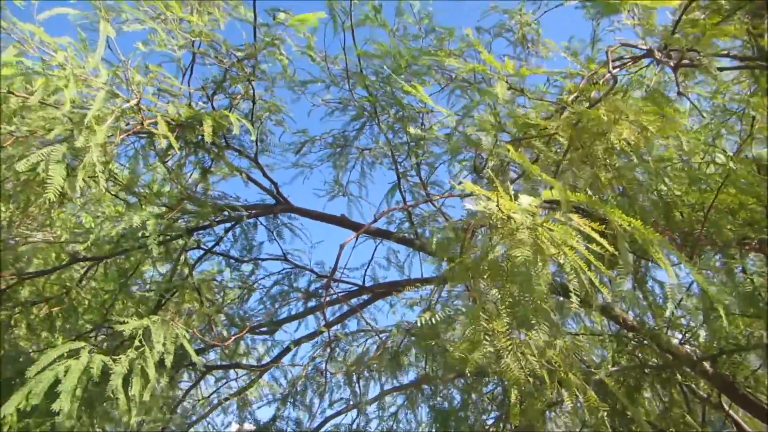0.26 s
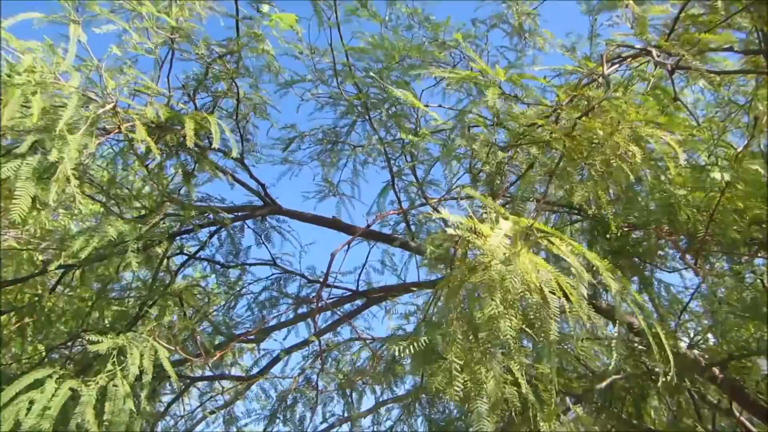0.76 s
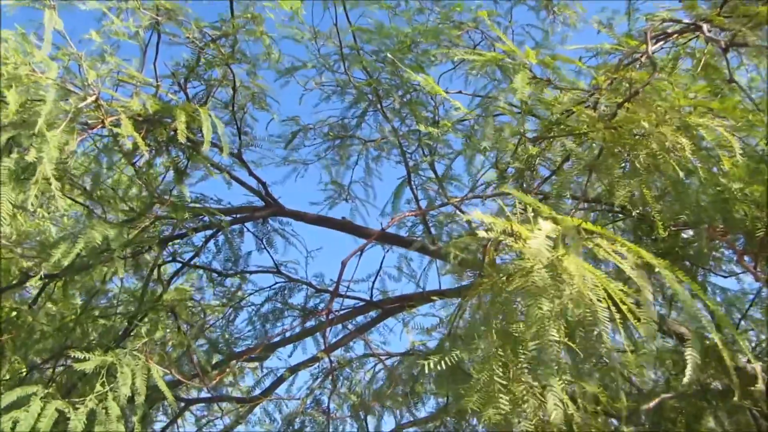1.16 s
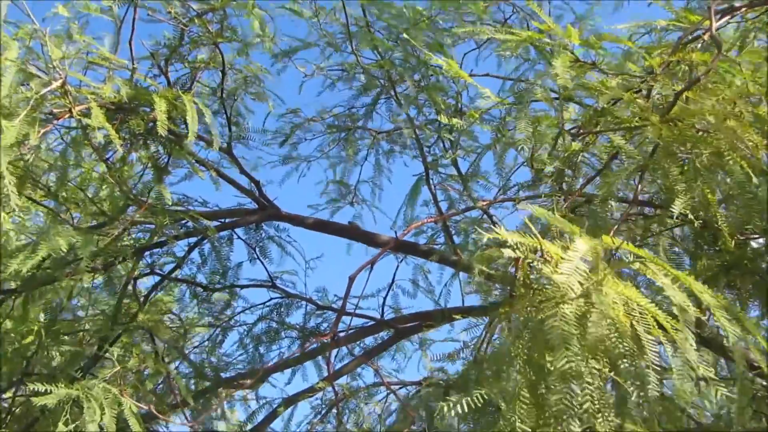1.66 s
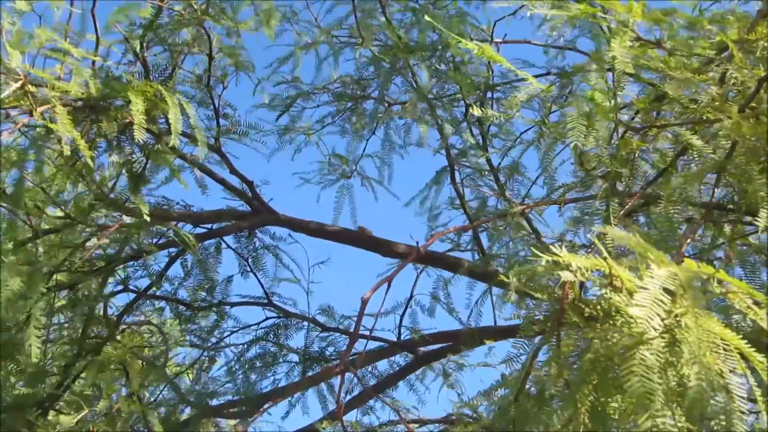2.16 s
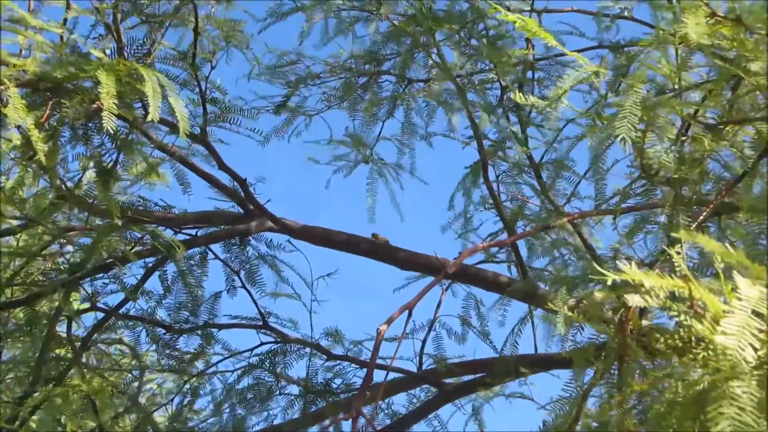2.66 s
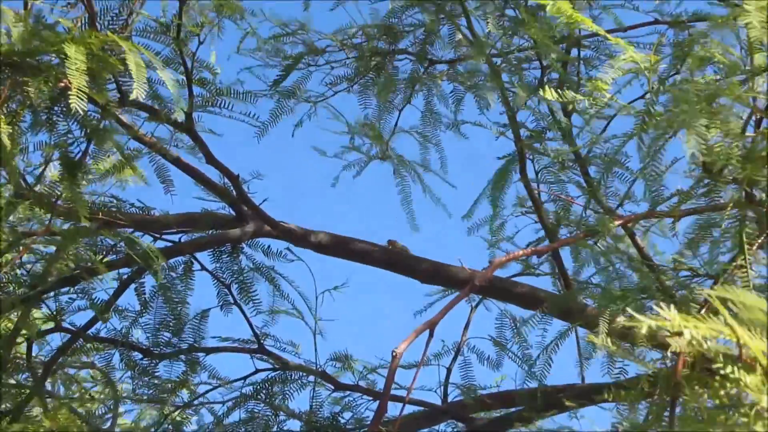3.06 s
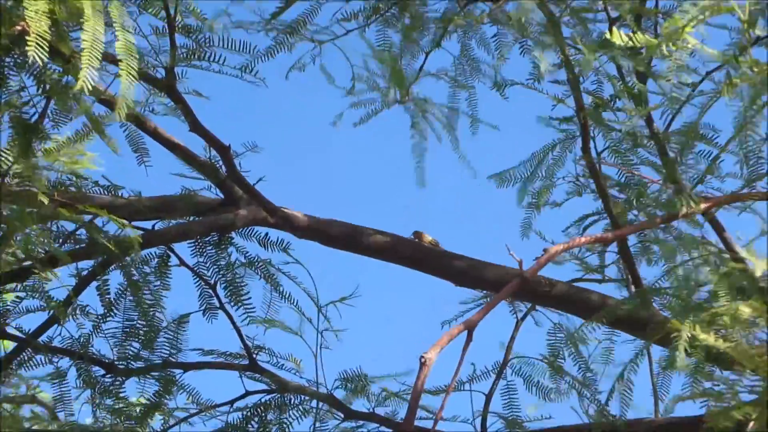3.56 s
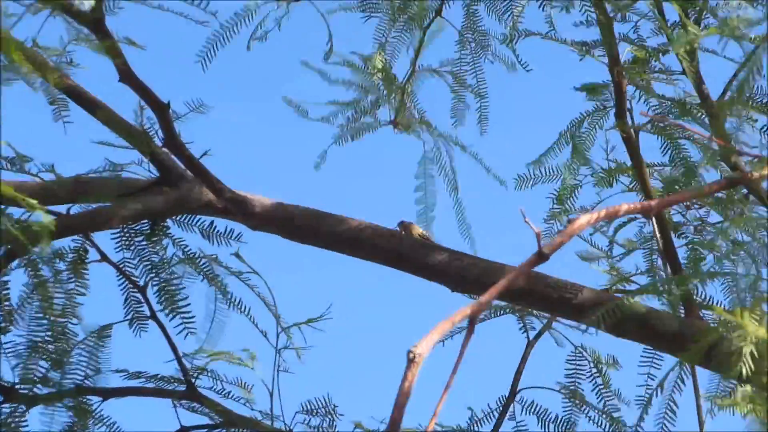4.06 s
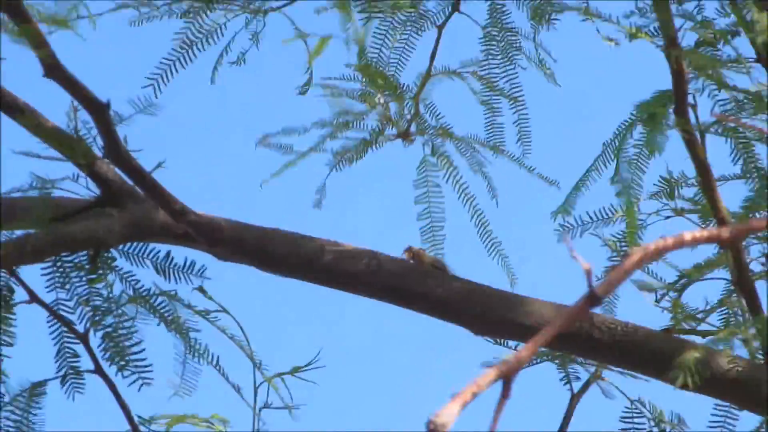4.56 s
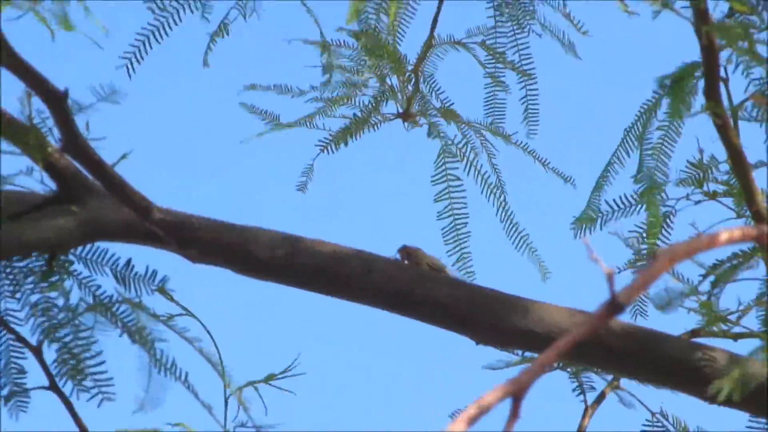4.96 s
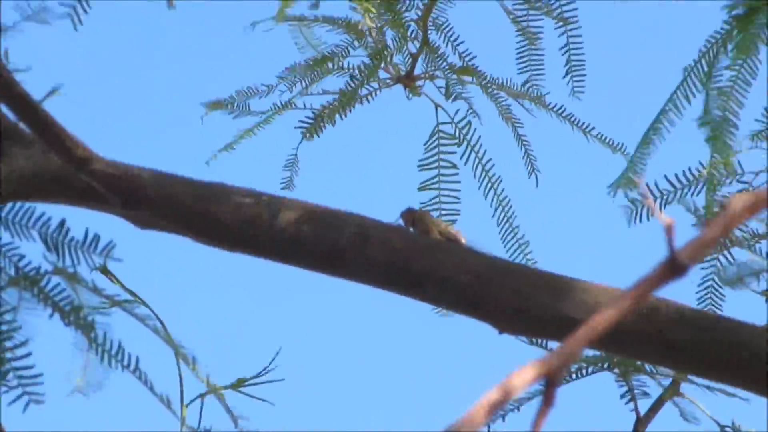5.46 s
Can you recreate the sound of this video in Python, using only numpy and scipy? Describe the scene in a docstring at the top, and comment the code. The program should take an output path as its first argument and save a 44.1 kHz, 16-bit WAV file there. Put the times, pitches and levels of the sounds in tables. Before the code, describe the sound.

A cicada sings a steady, high-pitched buzz in a tree overhead, with a fainter one farther off and a low outdoor rumble. Early on, a click starts a faint camera zoom whirr and the buzz turns thinner. The song swells, then slowly weakens. Soft wind puffs and low bumps touch the microphone. Near the end the lens ticks to a stop, and the buzz carries on, fuller in tone but more relaxed.

```python
"""A cicada sings overhead, its tymbals buckling about 160 times a second in quick runs of rib clicks.
A distant one buzzes a little slower, over a faint outdoor rumble. At 0.6 s a camera lens starts to zoom:
its drive ticks, its motor whirrs, and a fixed filter against the whine clicks in and thins the song.
The near song swells until 2.4 s, then slowly tires. From 3.7 s come puffs of wind and bumps on the camera.
Around 4.6 s the near cicada eases off, the motor stops, the filter drops out and the drive ticks to rest."""
import sys
import numpy as np
from scipy import signal
from scipy.fft import rfft, irfft, next_fast_len
from scipy.io import wavfile
from scipy.ndimage import uniform_filter1d, map_coordinates

SR = 44100
rng = np.random.default_rng(int(sys.argv[2]) if len(sys.argv) > 2 else 0)


def persist_wave(psi):
    """Save psi, clipped to +-1, as 16-bit WAV."""
    counts = np.round(np.clip(psi, -1, 1) * 32767).astype(np.int16)
    wavfile.write(sys.argv[1], SR, np.atleast_2d(counts).T)


N = 251370
T = np.arange(N) / SR


def amp(db):
    """Decibels to gain."""
    return 10 ** (np.asarray(db) / 20)

def rms(x):
    """Root mean square."""
    return np.sqrt(np.mean(x ** 2) + 1e-20)

def gain_at(spectrum, hz):
    """Gain between (freq_hz, gain_db) points, log frequency axis."""
    freq_hz, gain_db = np.transpose(spectrum)
    return amp(np.interp(np.log(hz + 1), np.log(freq_hz + 1), gain_db))

def wobble(knots_per_s):
    """Smooth random curve."""
    return map_coordinates(rng.standard_normal(int(T[-1] * knots_per_s) + 4), [T * knots_per_s])

def swell(crest_s, crest_db, drop_db_per_s2):
    """Gain with one broad crest."""
    return amp(crest_db - drop_db_per_s2 * (T - crest_s) ** 2)

def bell(centre_s, sigma_s):
    """Gaussian envelope."""
    return np.exp(-.5 * ((T - centre_s) / sigma_s) ** 2)

def filtered(x, response):
    """x through a frequency response."""
    size = next_fast_len(N + SR // 2)
    return irfft(rfft(x, size) * response(np.fft.rfftfreq(size, 1 / SR)), size)[:N]

def noise(spectrum):
    """Coloured noise, rms 1."""
    x = filtered(rng.standard_normal(N), lambda hz: gain_at(spectrum, hz))
    return x / rms(x)

def causal_filter(x, spectrum, size=2048):
    """x through a minimum-phase filter."""
    cepstrum = irfft(np.log(gain_at(spectrum, np.fft.rfftfreq(size, 1 / SR))))
    cepstrum[1:size // 2] *= 2
    cepstrum[size // 2 + 1:] = 0
    return signal.fftconvolve(x, irfft(np.exp(rfft(cepstrum))))[:N]

def impulses(times_s, gains, order=16):
    """Windowed-sinc impulses, placed between samples."""
    position = np.ravel(times_s)[:, None] * SR
    index = np.floor(position).astype(int) + np.arange(1 - order, order + 1)
    kernel = np.sinc(index - position) * np.cos(np.pi * (index - position) / (2 * order)) ** 2
    inside = (index >= 0) & (index < N)
    return np.bincount(index[inside], (np.ravel(gains)[:, None] * kernel)[inside], N)


# ribs of one stroke: delay_s, level_db
TYMBAL_RIBS = [(0, -2.4), (.000201, 0), (.0006, -6), (.00099, -5), (.001089, -13), (.001388, -10),
               (.001669, -12.4), (.00193, -12.3)]
# body resonance under one rib click: freq_hz, gain_db
BODY_RESONANCE = [(1500, -58), (2500, -46), (3850, -43), (4600, -49), (5800, -28.7), (6500, -13),
                  (7500, -14.5), (8800, .3), (10000, -7.6), (11200, .4), (12300, -13), (13700, -4.8),
                  (14700, -18), (15800, -25)]

def tymbal(stroke_hz):
    """Each stroke buckles the ribs in turn and rings the body; later ribs are less punctual."""
    count = int(T[-1] * stroke_hz) + 1
    strokes_s = (np.arange(count) + rng.random()) / stroke_hz
    jitter_s = 5e-5 * rng.standard_normal(count)
    drift_s = 1.6e-5 * np.cumsum(rng.standard_normal(count))
    strokes_s += jitter_s + drift_s
    delay_s, rib_db = np.transpose(TYMBAL_RIBS)
    stretch = 1 + .007 * rng.standard_normal((count, len(delay_s)))
    stroke_db = .15 * rng.standard_normal((count, 1))
    scatter_db = (.15 + delay_s / .0025) * rng.standard_normal(stretch.shape)
    clicks = impulses(strokes_s[:, None] + delay_s * stretch, amp(rib_db + stroke_db + scatter_db))
    return causal_filter(clicks, BODY_RESONANCE)

def branch_echoes(song, t60_s, tails=8):
    """Branches scatter the song; the echoes change slowly as the leaves sway."""
    t = T[:SR // 4]
    sway = np.linspace(0, tails - 1, N)
    echoes = np.zeros(N)
    for k in range(tails):
        tail = rng.standard_normal(len(t)) * amp(-60 * t / t60_s) * (t > .002)
        crossfade = np.cos(np.pi / 2 * np.clip(sway - k, -1, 1))
        echoes += crossfade * signal.fftconvolve(song, tail / np.linalg.norm(tail))[:N]
    return echoes

def effort(tire_per_s, start_s=.76, rise_s=1.63, relax_at_s=4.56, relax_s=.36, relax_share=.65):
    """The cicada pushes once, tires, then relaxes: 0 easy, 1 full effort."""
    rise = np.clip((T - start_s) / rise_s, 0, 1)
    tired = tire_per_s * np.maximum(T - start_s - rise_s, 0)
    relaxed = np.clip((T - relax_at_s) / relax_s, 0, 1)
    return (rise - tired) * (1 - relax_share * relaxed)

# brightening at full effort: freq_hz, gain_db
STRAIN_EQ = [(7000, -1.5), (9000, -0.5), (10200, 0), (11200, 1.54), (14000, -0.6)]

def near_cicada(stroke_hz, echo_db, easy_db=-25.5, push_db=3.5, tire_db_per_s=.57):
    """Mostly direct sound; effort makes it louder and brighter."""
    song = tymbal(stroke_hz)
    treble_rms = rms(filtered(song, lambda hz: hz > 9500))
    push = effort(tire_per_s=tire_db_per_s / push_db)
    song += push * (causal_filter(song, STRAIN_EQ) - song)
    flicker_db = .48 * wobble(14)
    song *= amp(easy_db + push_db * push + flicker_db) / treble_rms
    return song + amp(echo_db) * branch_echoes(song, t60_s=.045)


# treble loss through leaves: freq_hz, gain_db
FOLIAGE_EQ = [(7000, 1), (9000, -3), (11000, -14.5), (14000, -8)]

def distant_cicada(stroke_hz, echo_db):
    """A song dulled by leaves and scattered by branches."""
    song = causal_filter(tymbal(stroke_hz), FOLIAGE_EQ)
    song *= swell(crest_s=2.78, crest_db=-33, drop_db_per_s2=.47) / rms(song)
    return song + amp(echo_db) * branch_echoes(song, t60_s=.079)


# outdoor rumble: freq_hz, density_db
RUMBLE_SPECTRUM = [(20, -18), (45, -3.5), (80, 0), (150, -2), (420, -12.5), (1100, -14.5), (1900, -23),
                   (4500, -25), (16000, -47)]

def outdoors(hum_hz, hum_db, restless_db=.8):
    """A slightly restless rumble and a faint wavering hum."""
    hum = amp(hum_db) * np.sin(2 * np.pi * hum_hz * T + 1.7 * wobble(10))
    envelope = swell(crest_s=2.8, crest_db=-52.5, drop_db_per_s2=.25) * amp(restless_db * wobble(16))
    return envelope * noise(RUMBLE_SPECTRUM) + hum


# bumps on the camera: centre_s, peak_db, pitch_hz
CAMERA_BUMPS = [(.542, -38.5, 150), (3.848, -29, 80), (4.09, -34, 100), (4.163, -27, 230), (4.35, -42, 70),
                (4.52, -43, 70), (4.917, -39.5, 110)]

def camera_bumps(sigma_cycles=.46):
    """Each bump is one low push on the camera body, about a cycle long."""
    return sum(amp(peak_db) * bell(centre_s, sigma_cycles / hz) * np.cos(2 * np.pi * hz * (T - centre_s))
               for centre_s, peak_db, hz in CAMERA_BUMPS)


# ticks that ring the lens barrel: start_s, gain_db, tilt_db_per_octave; the first is the click of the knock at
# 0.542 s, the rest come from the lens drive
DRIVE_TICKS = [(.542, -50, 2), (0.633, -41, 14), (4.637, -41, 5), (4.695, -47, -3), (4.717, -35.5, -3.5),
               (4.722, -37, -4), (4.729, -35.5, -5), (4.776, -35, 6)]
# lens barrel modes: pitch_hz, level_db, t60_s
BARREL_MODES = [(1424, -6, 0.024), (1700, -8.5, 0.022), (2340, -4.5, 0.029), (2430, -8.5, 0.015),
                (2620, -13, 0.036), (3750, -6, 0.0053)]

def lens_ticks(pivot_hz=2200, attack_s=.00011):
    """A knock on the camera at 0.542 s, then the drive ticks against the barrel as it starts and settles; each
    rings the barrel's modes."""
    t = T[:SR // 10]
    attack = 1 - np.exp(-t / attack_s)
    ticks = np.zeros(N)
    for start_s, gain_db, tilt_db_per_octave in DRIVE_TICKS:
        ring = np.zeros(len(t))
        for hz, level_db, t60_s in BARREL_MODES:
            struck_db = level_db + tilt_db_per_octave * np.log2(hz / pivot_hz) + rng.normal(0, .67)
            ring += amp(struck_db - 60 * t / t60_s) * np.sin(2 * np.pi * (hz * t + rng.random()))
        ticks[round(start_s * SR):][:len(t)] += amp(gain_db) * attack * ring
    return ticks


def zoom_gate(start_s=.605, end_s=4.635):
    """1 while the lens motor runs, else 0; edges smoothed."""
    return uniform_filter1d(1. * ((T > start_s) & (T < end_s)), size=64)

# motor whirr: freq_hz, density_db
WHIRR_SPECTRUM = [(100, -15), (600, 9), (1400, -11), (2000, -3), (2500, 7.5), (3100, -6), (8000, -15)]

def lens_motor(level_db):
    """The motor whirrs during the zoom."""
    return amp(level_db) * zoom_gate() * noise(WHIRR_SPECTRUM)

# cut against motor whine: freq_hz, gain_db
WHINE_EQ = [(2000, 0), (3000, -5), (4400, -5), (5500, -11.5), (7000, -10), (8700, -4.5), (10000, -2.5),
            (11200, -2.8), (15000, -0.5)]

def whine_filter(sound, click_s=.605, click_db=-19):
    """A fixed filter clicks in for the zoom and thins the whole sound."""
    thinned = sound + zoom_gate() * (causal_filter(sound, WHINE_EQ) - sound)
    return thinned + impulses([click_s], [amp(click_db)])


# puffs of wind: centre_s, level_db, sigma_s
WIND_PUFFS = [(3.676, -50.5, 0.057), (3.877, -43, 0.047), (4.102, -42, 0.049), (4.368, -50, 0.035),
              (4.505, -45.5, .018), (4.68, -52.5, 0.059)]
# wind on the microphone: freq_hz, density_db
WIND_SPECTRUM = [(20, -22), (45, -7), (70, 0), (110, 2.5), (200, -6.5), (350, -17.5), (700, -42),
                 (2000, -80)]

def wind_puffs():
    """Short puffs rumble on the microphone."""
    envelope = sum(amp(db) * bell(centre_s, sigma_s) for centre_s, db, sigma_s in WIND_PUFFS)
    return envelope * noise(WIND_SPECTRUM)


def scene():
    """Two cicadas, outdoor rumble, camera noises and wind; mono."""
    cicadas = near_cicada(stroke_hz=160.54, echo_db=-13) + distant_cicada(stroke_hz=154, echo_db=-1.5)
    background = outdoors(hum_hz=1091, hum_db=-73)
    camera = camera_bumps() + lens_ticks() + lens_motor(level_db=-64)
    return (cicadas + background + camera + wind_puffs())[None]

def record(dry):
    """The whine filter, then a narrow treble notch and a band limit."""
    notch_hz, half_width_hz, depth, top_hz = 12400, 90, .92, 15850
    notch = lambda hz: 1 - depth / (1 + 1j * (hz - notch_hz) / half_width_hz)
    return filtered(whine_filter(dry[0]), lambda hz: notch(hz) * (hz < top_hz))[None]


dry = scene()
out = record(dry)
persist_wave(out)
```